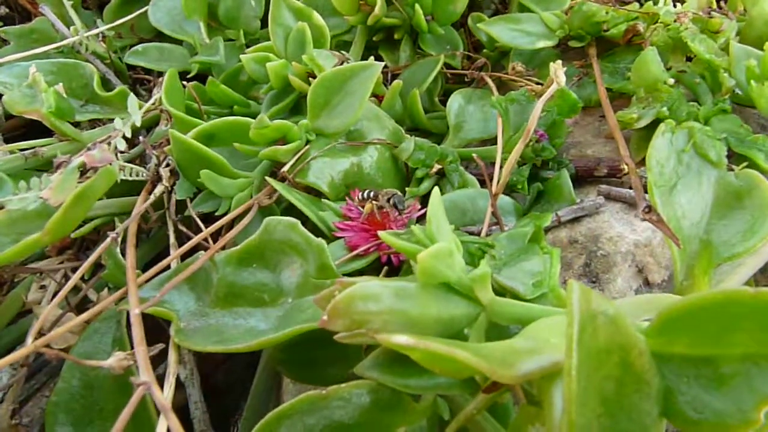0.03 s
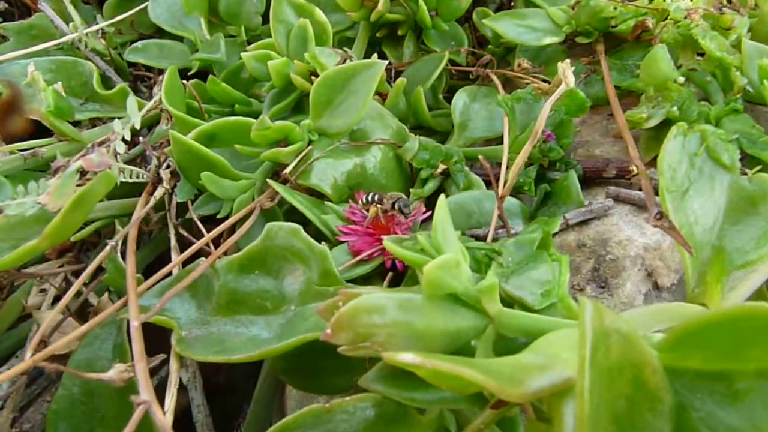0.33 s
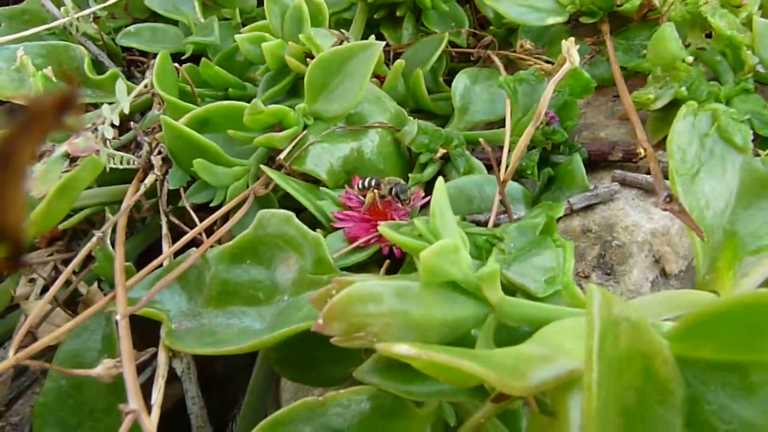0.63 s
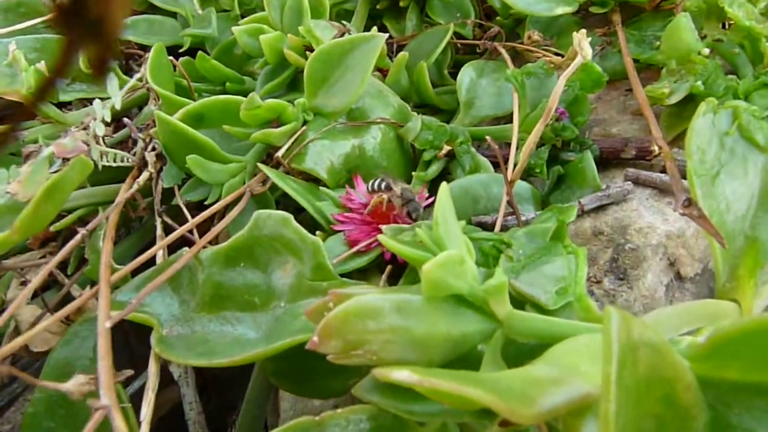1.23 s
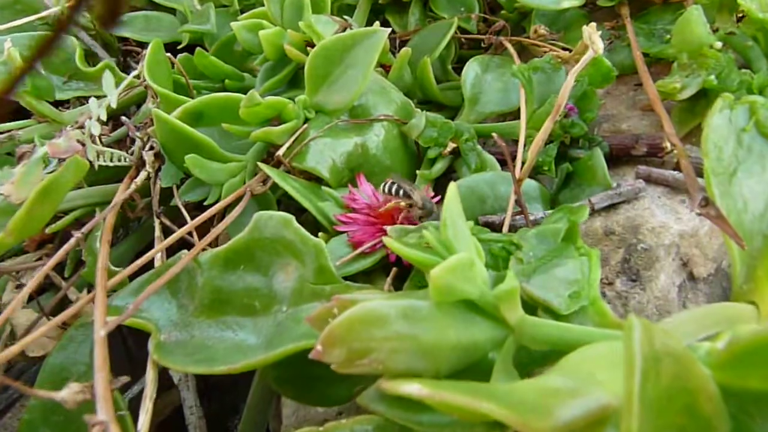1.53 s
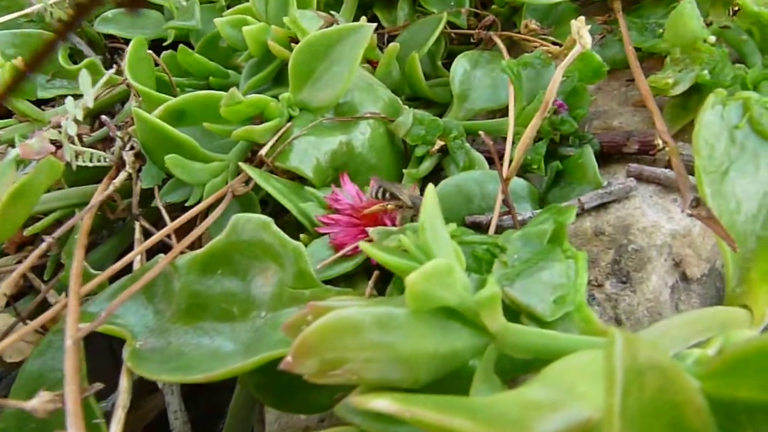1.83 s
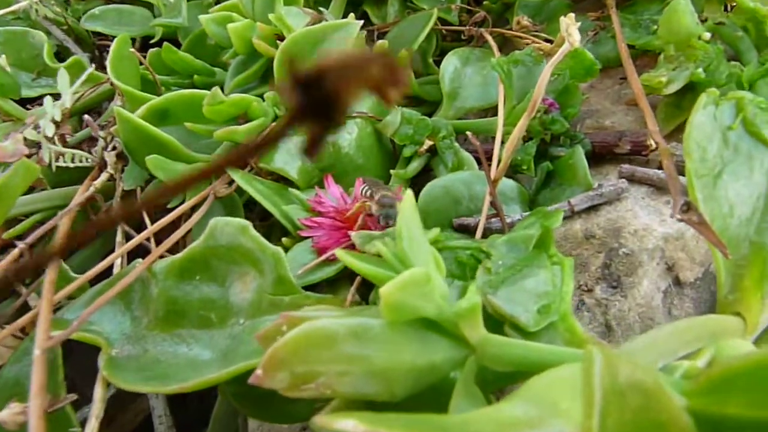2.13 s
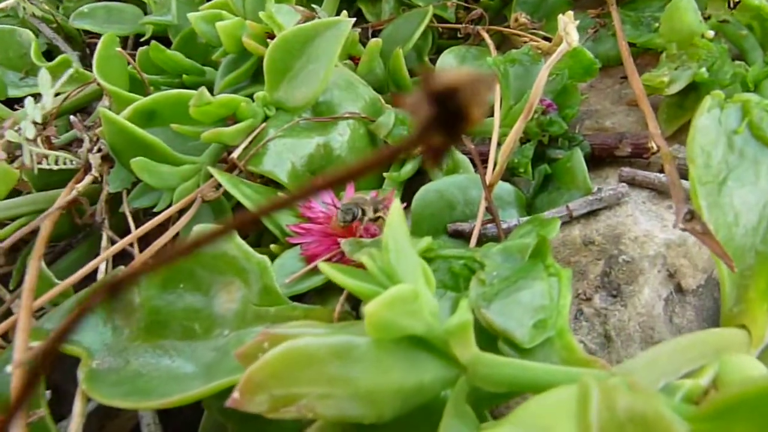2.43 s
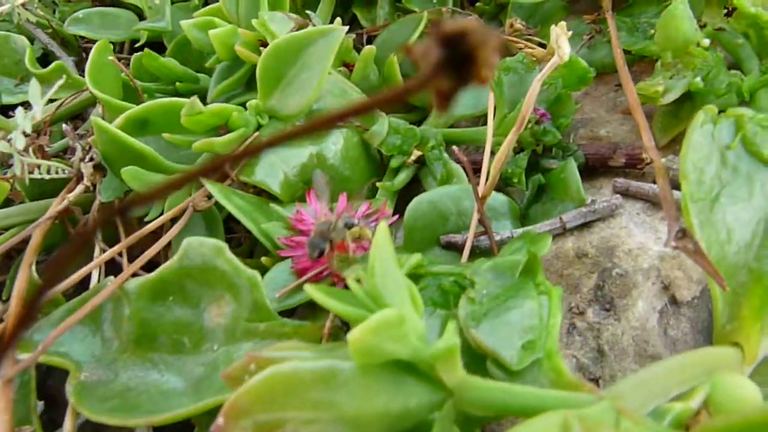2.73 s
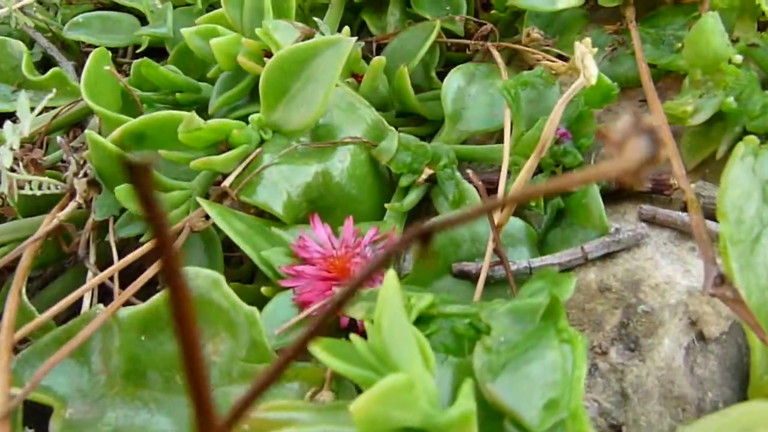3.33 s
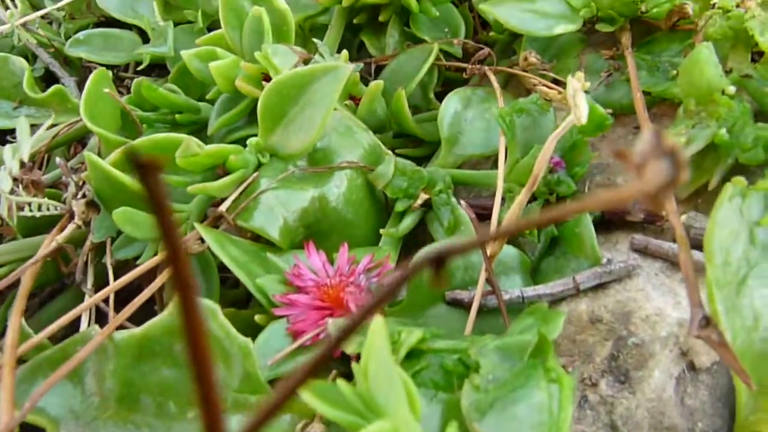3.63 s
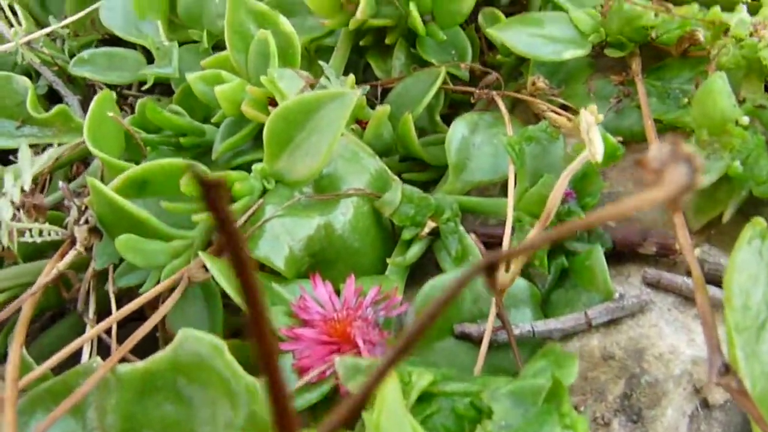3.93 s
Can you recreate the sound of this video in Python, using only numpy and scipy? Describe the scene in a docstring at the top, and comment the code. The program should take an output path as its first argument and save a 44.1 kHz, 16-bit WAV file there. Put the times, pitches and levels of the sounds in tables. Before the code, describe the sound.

A bee buzzes faintly close by from about 2.8 seconds, wavering in pitch and level, then fading near 4 seconds. Before it, a quiet garden gives only soft steady hiss and tiny ticks from a hand-held camera, with one clear hollow knock at about 1.1 seconds. Low bumps and rumble from moving the camera come from around 2.2 seconds, strongest near 2.7 and 3.4 seconds.

```python
"""A bee lifts off a flower and hovers close by, each wingbeat a pulse of buzz and a puff of torn air.
Before it takes off, the hollow body of a hand-held camera ticks faintly and gives one clear knock.
Soft low bumps and rumble reach the microphone as the camera is moved.
Under it all lies a quiet garden bed: still air, a steady hiss and a faint electronic whine."""
import sys
import numpy as np
from scipy import signal
from scipy.fft import rfft, irfft
from scipy.io import wavfile

SR = 44100
rng = np.random.default_rng(int(sys.argv[2]) if len(sys.argv) > 2 else 0)


def unload_wav(signal):
    """Save mono or channel-first audio to the path in sys.argv[1] as 16-bit WAV at rate SR, clipped to [-1, 1]."""
    wavfile.write(
        sys.argv[1],
        SR,
        np.round(np.clip(np.atleast_2d(signal).T, -1, 1) * 32767).astype(np.int16),
    )


N = 176400
T = np.arange(N) / SR


def from_db(db):
    """Decibels to gain."""
    return 10 ** (np.asarray(db) / 20)


def rms_one(x):
    """Scale to an rms of 1."""
    return x / np.sqrt(np.mean(x ** 2) + 1e-20)


def automation(points):
    """A control curve through (time_s, value) points, at every sample."""
    return np.interp(T, *np.transpose(points))


def db_at_hz(spectrum, hz):
    """Read a spectrum's level on a log-frequency axis."""
    freq_hz, level_db = np.transpose(spectrum)
    return np.interp(np.log(hz + 1e-9), np.log(freq_hz), level_db)


def drift(rate_hz):
    """Smooth random wander with an rms of about 1."""
    hop, settle = 40, 2000
    pole = np.exp(-2 * np.pi * hop * rate_hz / SR)
    white = rng.standard_normal(N // hop + settle + 2)
    slow = signal.lfilter([1], [1, -2 * pole, pole * pole], white)[settle:]
    return np.interp(np.arange(N) / hop, np.arange(len(slow)), rms_one(slow))


def coloured_noise(spectrum):
    """Noise shaped to a spectrum, rms 1."""
    gain = from_db(db_at_hz(spectrum, np.arange(N // 2 + 1) * SR / N))
    return rms_one(irfft(rfft(rng.standard_normal(N)) * gain, N))


def band_noise(edges_hz):
    """Noise between two steep edges, rms 1."""
    sos = signal.butter(2, edges_hz, "band", fs=SR, output="sos")
    return rms_one(signal.sosfilt(np.vstack([sos, sos]), rng.standard_normal(N)))


def swell(t, peak_s):
    """An envelope that rises to 1 at peak_s, then dies away."""
    u = np.maximum(t, 0) / peak_s
    return u * np.exp(1 - u)


def garden_bed():
    """Still outdoor air, a slightly flickering hiss and the faint whine of the camera's electronics."""
    # colour of the air: freq_hz, level_db
    air_colour = [(25, -4), (60, -3.5), (110, -2.5), (180, -8), (320, -8), (450, -15), (700, -12),
                  (1200, -21.5), (2000, -30.5), (4000, -33.5)]
    # colour of the hiss: freq_hz, level_db
    hiss_colour = [(500, 4.5), (2000, 3.5), (3000, 0.5), (5000, -1.5), (7000, -2), (7800, -10.5),
                   (8400, -20), (8900, -22.5)]
    # fader on the hiss: time_s, level_db
    hiss_level = [(0, -68.5), (2.0, -68.5), (3.0, -68), (4, -67.5)]
    air_db, flicker_db, whine_db, whine_hz = -57, 1, -92.5, 6630
    air = from_db(air_db) * coloured_noise(air_colour)
    hiss = from_db(automation(hiss_level) + flicker_db * drift(30)) * coloured_noise(hiss_colour)
    whine = from_db(whine_db) * np.sin(2 * np.pi * whine_hz * T)
    return air + hiss + whine


def handling():
    """Moving the camera makes an uneven rumble and soft bumps, each a push and pull of pressure."""
    # fader on the rumble: time_s, level_db
    rumble_level = [(0, -58.5), (.35, -61.5), (.9, -68), (1.2, -59.5), (1.4, -84), (2.06, -72.5),
                    (2.18, -51), (2.4, -42.5), (2.52, -60), (2.6, -62), (2.71, -37), (2.83, -47.5),
                    (2.92, -38.5), (3.0, -68), (3.33, -64), (3.41, -31), (3.48, -41.5), (3.58, -54),
                    (3.67, -42.5), (3.8, -43.5), (3.9, -60), (4, -51.5)]
    # colour of the rumble: freq_hz, level_db
    rumble_colour = [(25, -9), (50, -1), (85, 1.5), (125, -1.5), (200, -9.5), (270, -18.5), (500, -35),
                     (1000, -58.5)]
    # soft bumps on the microphone: centre_s, level_db, pitch_hz
    bumps = [(0.064, -48, 167), (.950, -43, 120), (1.2005, -43, 64.4), (1.6268, -31.5, 274),
             (2.1911, -29, 163), (2.363, -31.5, 75.6), (2.384, -36.5, 90), (2.667, -28, 103),
             (2.679, -26, 112), (2.706, -19.5, 118), (2.7136, -28.5, 275), (2.744, -28.5, 85),
             (2.782, -23, 140), (2.873, -24, 98.6), (2.914, -29, 123), (3.3969, -26.5, 115),
             (3.405, -22.5, 148), (3.4209, -24.5, 107.8), (3.440, -28.5, 233), (3.655, -29, 163),
             (3.677, -28.5, 160), (3.838, -30, 101)]
    wobble_db, half_width_cycles = 1.8, 0.44
    out = from_db(automation(rumble_level) + wobble_db * drift(8.2)) * coloured_noise(rumble_colour)
    for centre_s, level_db, pitch_hz in bumps:
        cycles = pitch_hz * (T - centre_s)
        envelope = np.exp(-np.minimum((cycles / half_width_cycles) ** 2, 20))
        out -= from_db(level_db) * np.sin(2 * np.pi * cycles) * envelope
    return out


def camera_body():
    """Knocks and tiny creaks of the grip set the hollow body ringing; each knock adds a dry scuff."""
    # knocks and ticks: start_s, level_db, hardness_db (added to upper modes), scuff_db (against level_db)
    knocks = [(.012, -52, -11, -24), (.152, -54, -3, -22), (.4185, -47.5, -11, -24), (.463, -51.5, -5, -14),
              (.585, -55.5, 2, -12), (.860, -51, -1, -17), (.938, -51, -7, -26), (1.0869, -23, 3, -26),
              (1.3435, -49, -9, -13), (1.4365, -46, -8, -24), (1.5244, -40, -2.5, -25),
              (1.545, -47, -19, -22), (1.598, -50, 0, -21), (1.856, -48.5, 5, -23), (1.922, -53, 6, -18),
              (2.302, -38.5, -9, -19.5)]
    # resonances of the body: pitch_hz, gain_db, peak_s
    modes = [(308, -16.5, 0.0078), (746, -2, 0.0057), (1079, -13.5, 0.0053), (1303, -19.5, 0.0027),
             (1580, -37, 0.0025), (3340, -42, .0035)]
    creaks_per_s, creak_db, spread_db = 84, -64, 1.5
    upper_modes_hz = 900
    t = T[:SR // 8]
    start_s, level_db, hardness_db, scuff_db = np.transpose(knocks)
    onsets = (start_s * SR).astype(int)
    creaks = (rng.random(N) < creaks_per_s / SR) * from_db(creak_db + spread_db * rng.standard_normal(N))
    ring = np.zeros(N)
    for pitch_hz, gain_db, peak_s in modes:
        blows = np.bincount(onsets, from_db(level_db + hardness_db * (pitch_hz > upper_modes_hz)), N)
        grip = creaks * from_db(spread_db * rng.standard_normal(N))   # every creak favours other modes
        ping = from_db(gain_db) * swell(t, peak_s) * np.sin(2 * np.pi * pitch_hz * t)
        ring += signal.fftconvolve(blows + grip, ping)[:N]
    scuff_hits = np.bincount(onsets, from_db(level_db + scuff_db), N)
    scuff_envelope = signal.fftconvolve(scuff_hits, swell(t, peak_s=0.0012))[:N]
    return ring + scuff_envelope * band_noise(edges_hz=(1600, 3610))


def bee():
    """One pressure pulse per wingbeat, each a little off in time and strength, with a puff of torn air."""
    # wingbeat rate: time_s, pitch_hz
    wingbeat = [(2.83, 160), (2.89, 175.2), (2.93, 163.7), (2.97, 176.9), (3.07, 178.2), (3.16, 172.6),
                (3.24, 170.6), (3.31, 161.6), (3.36, 166.9), (3.41, 160.6), (3.47, 163.4), (3.51, 177.4),
                (3.59, 178.6), (3.70, 166), (3.74, 175), (3.81, 171.9), (3.87, 179.7), (3.97, 164.2)]
    # the bee swerving nearer and farther: time_s, level_db
    flight_level = [(2.81, -69.5), (2.86, -43.5), (2.93, -48), (2.97, -42), (3.01, -54.5), (3.06, -45.5),
                    (3.11, -51.5), (3.22, -46), (3.30, -51), (3.35, -44.5), (3.42, -47), (3.475, -40),
                    (3.54, -42), (3.61, -43), (3.69, -48.5), (3.77, -50.5), (3.85, -60.5), (3.95, -58.5),
                    (4.0, -69)]
    # brightness, added to the overtones and the torn air: time_s, gain_db
    brightness = [(2.85, -14), (2.94, -8), (3.04, 2), (3.15, -1.5), (3.4, -8), (3.6, -4), (3.75, 0),
                  (3.9, 10)]
    # tone colour of a wing stroke: freq_hz, level_db
    stroke_colour = [(175, -6), (350, -5), (525, -10), (700, -15.5), (880, -28), (1080, -26.5),
                     (1250, -23.5), (1420, -27), (1800, -35), (2500, -43), (4000, -47)]
    # torn air, strongest as the bee turns: time_s, gain_db
    wing_air = [(2.85, -5), (2.97, -8.5), (3.1, -29), (3.3, -20.5), (3.46, -12.5), (3.56, -20),
                (3.7, -16.5), (3.95, -11.5)]
    pitch_wander, overtone_flutter_db, level_flutter_db = 0.00796, 4, 0.5
    beat_scatter_s, beat_scatter_db = 0.00007, 1.5
    pitch_hz = automation(wingbeat) * (1 + pitch_wander * drift(25))
    phase = 2 * np.pi * (np.cumsum(pitch_hz) / SR + pitch_hz * beat_scatter_s * drift(150))
    bright_db = automation(brightness)
    buzz = np.zeros(N)
    for k in range(1, 21):
        share = min((k - 1) / 4, 1)   # none on the fundamental, full from the fifth harmonic up
        lift_db = share * (bright_db + overtone_flutter_db * drift(10))
        buzz += from_db(db_at_hz(stroke_colour, k * pitch_hz) + lift_db) * np.cos(k * phase)
    strokes = rms_one((1 + np.cos(phase)) ** 2)
    puffs = from_db(automation(wing_air) + bright_db) * band_noise(edges_hz=(334, 1200)) * strokes
    level_db = automation(flight_level) + level_flutter_db * drift(22) + beat_scatter_db * drift(80)
    airborne = T > flight_level[0][0]
    return airborne * from_db(level_db) * (np.sqrt(2) * buzz + puffs)


def scene():
    """All layers mixed in mono at the camera's microphone."""
    return (garden_bed() + handling() + camera_body() + bee())[None]


def record(dry):
    """A steep high cut, and a converter that sits slightly off zero."""
    stopband_hz, dc_offset = 8900, -0.0111
    high_cut = signal.cheby2(16, 60, stopband_hz, fs=SR, output="sos")
    return signal.sosfilt(high_cut, dry) + dc_offset


dry = scene()
out = record(dry)
unload_wav(out)
```